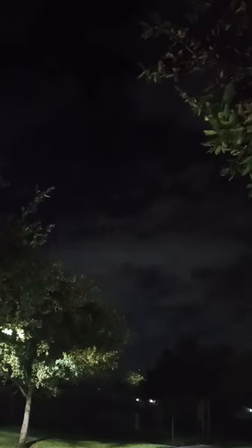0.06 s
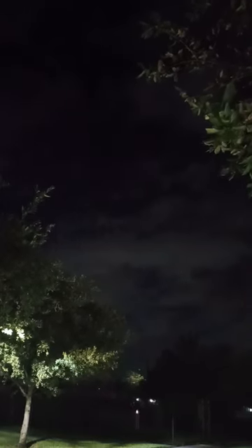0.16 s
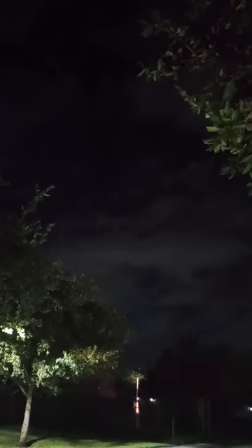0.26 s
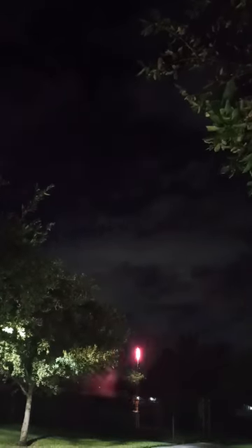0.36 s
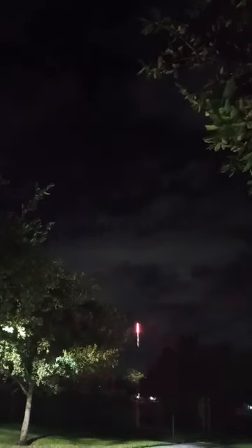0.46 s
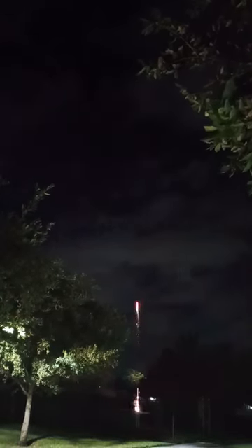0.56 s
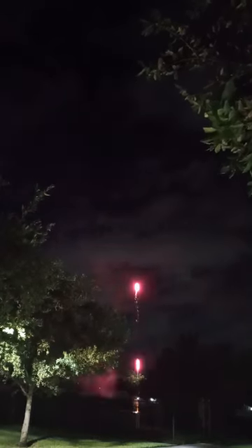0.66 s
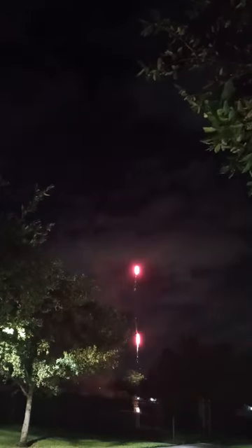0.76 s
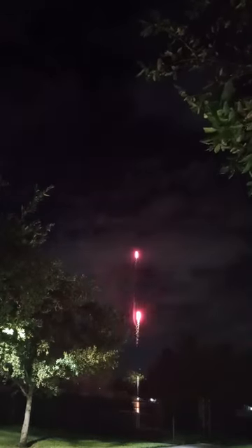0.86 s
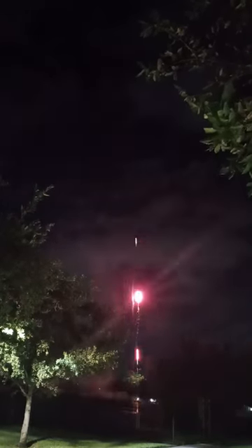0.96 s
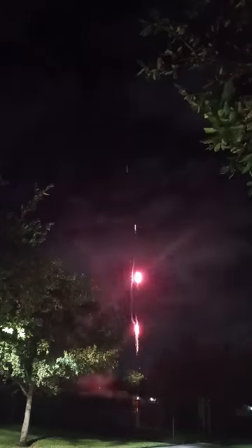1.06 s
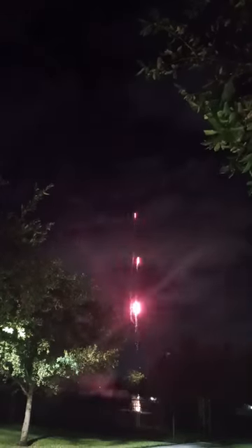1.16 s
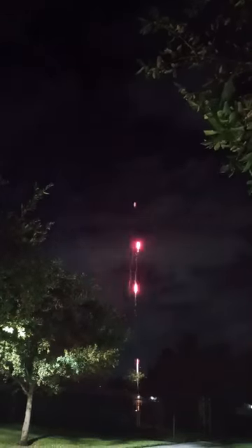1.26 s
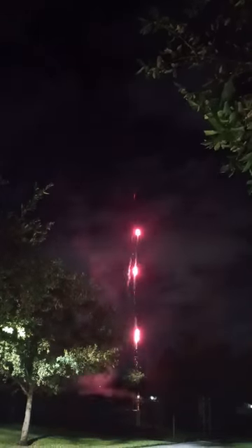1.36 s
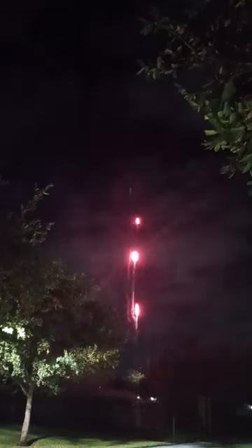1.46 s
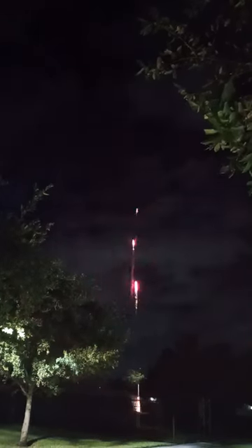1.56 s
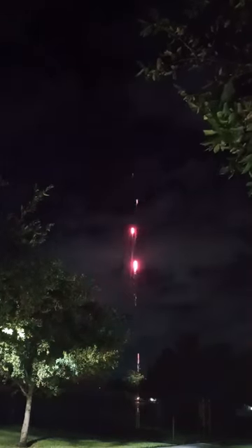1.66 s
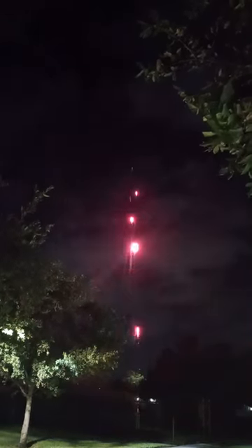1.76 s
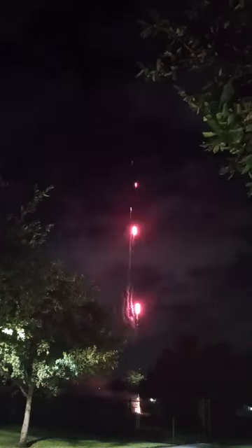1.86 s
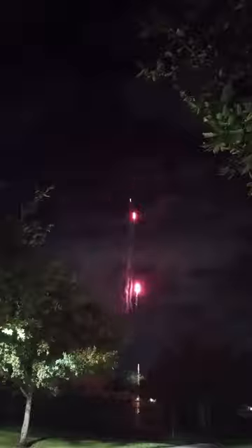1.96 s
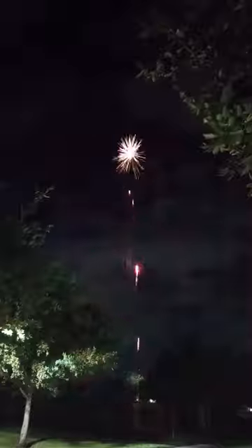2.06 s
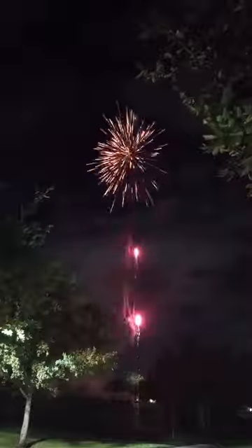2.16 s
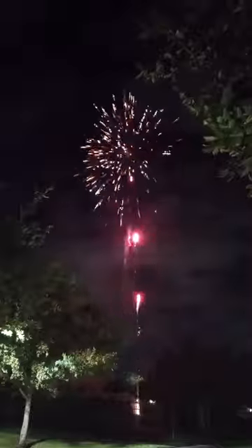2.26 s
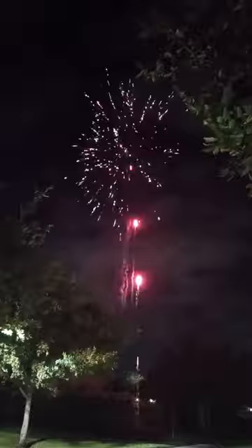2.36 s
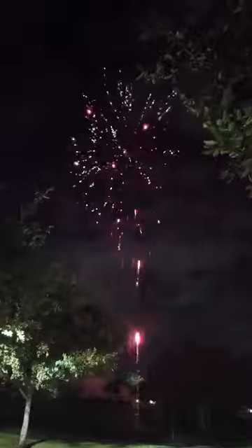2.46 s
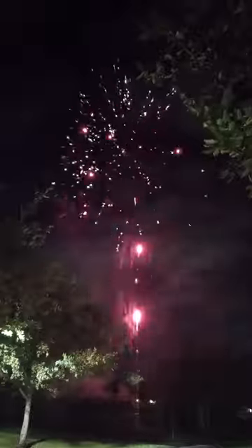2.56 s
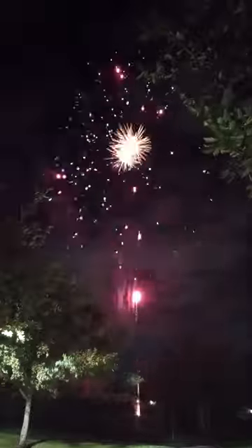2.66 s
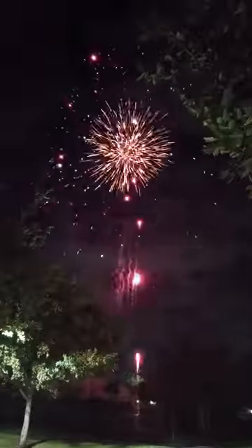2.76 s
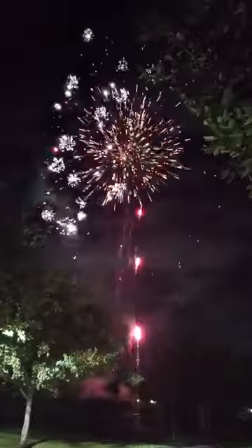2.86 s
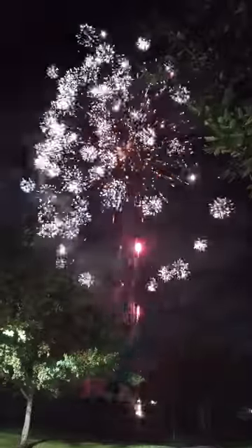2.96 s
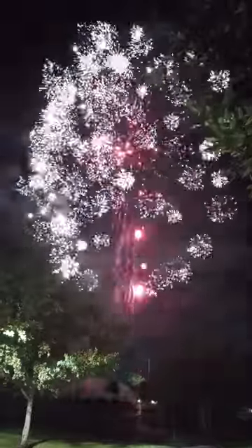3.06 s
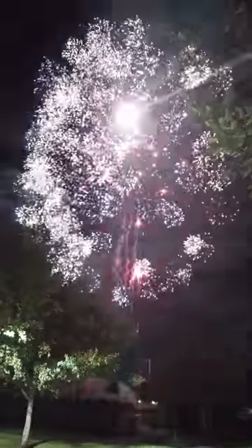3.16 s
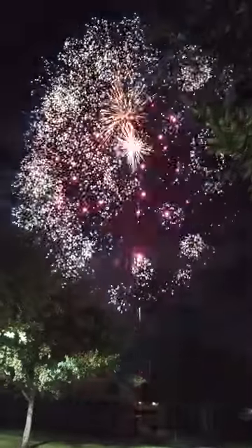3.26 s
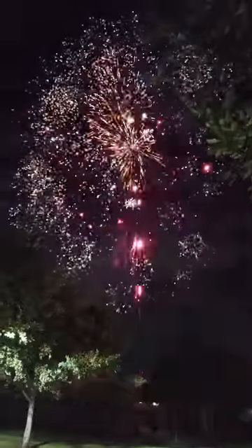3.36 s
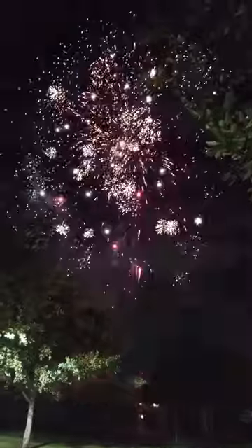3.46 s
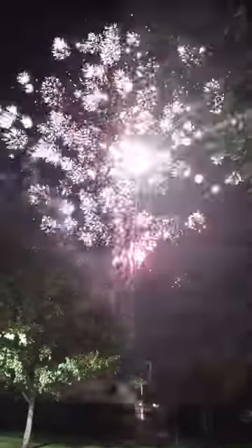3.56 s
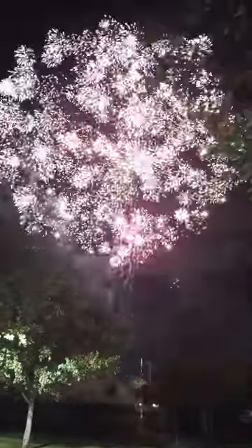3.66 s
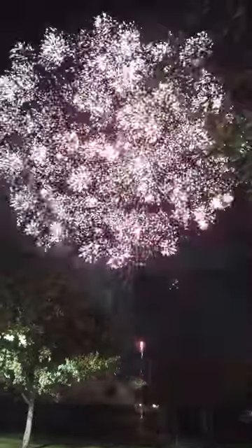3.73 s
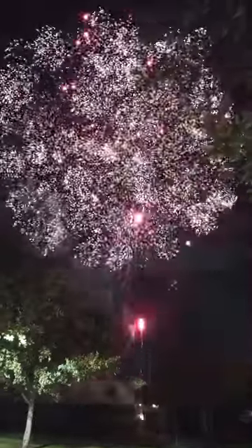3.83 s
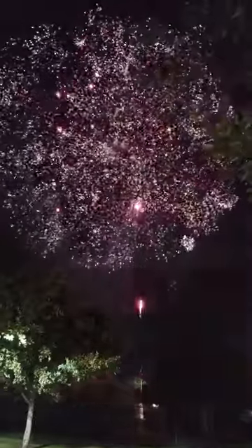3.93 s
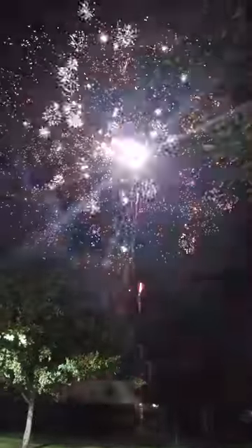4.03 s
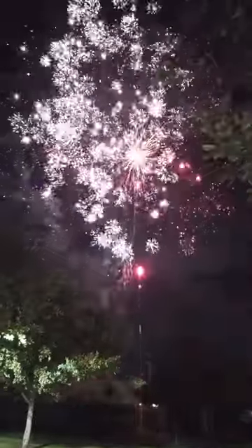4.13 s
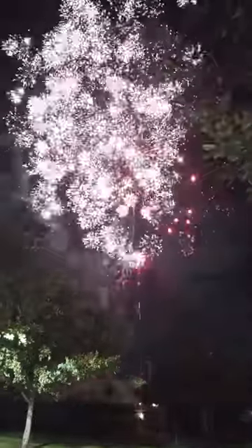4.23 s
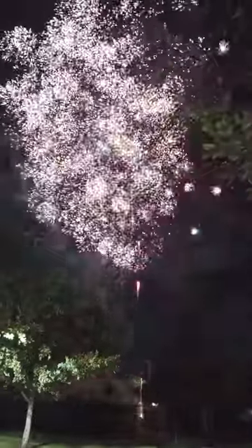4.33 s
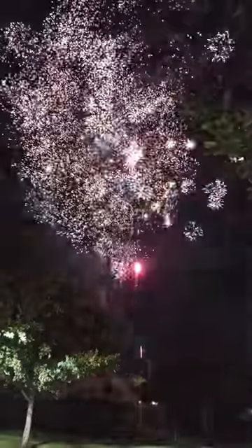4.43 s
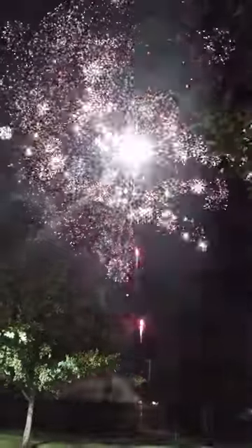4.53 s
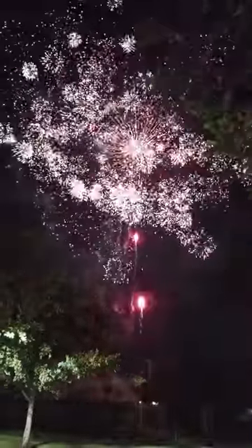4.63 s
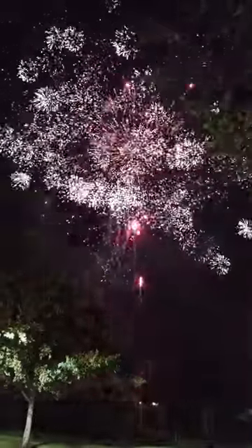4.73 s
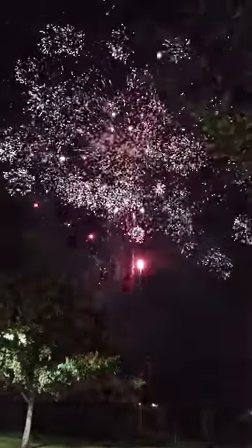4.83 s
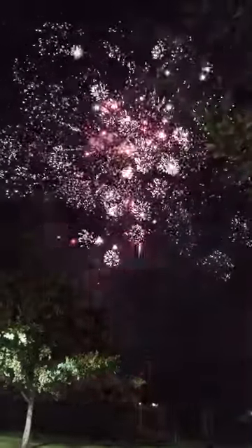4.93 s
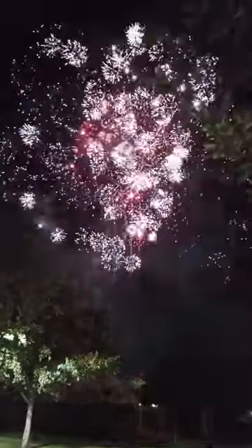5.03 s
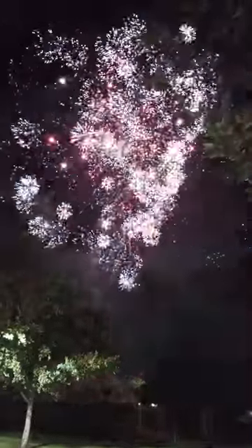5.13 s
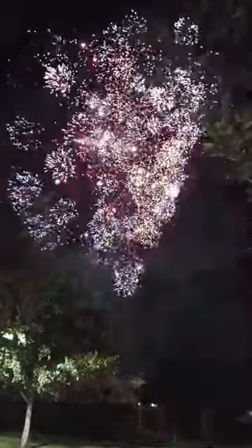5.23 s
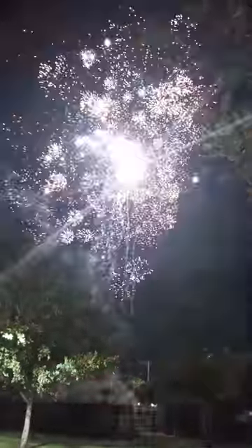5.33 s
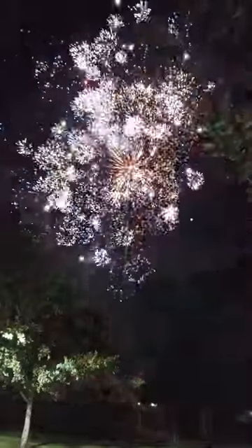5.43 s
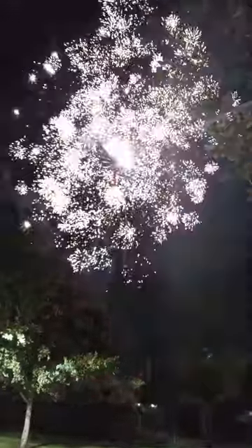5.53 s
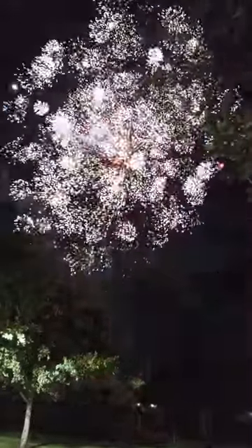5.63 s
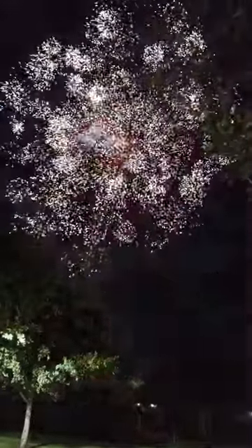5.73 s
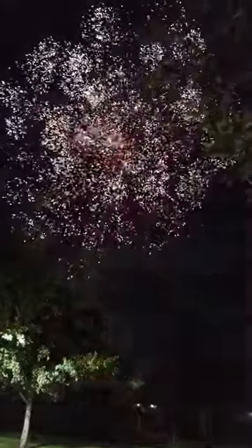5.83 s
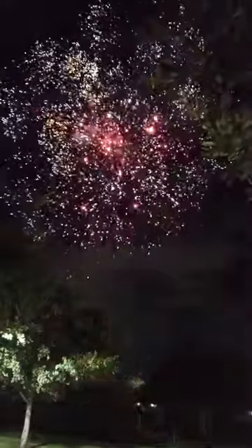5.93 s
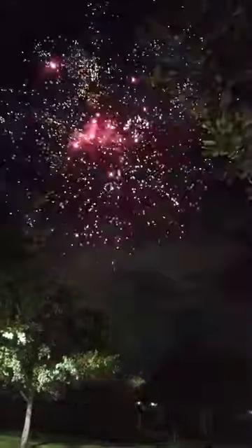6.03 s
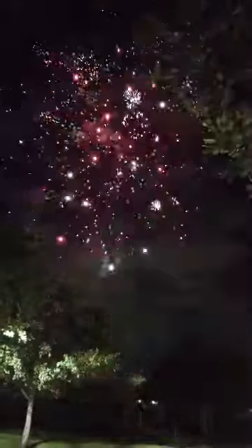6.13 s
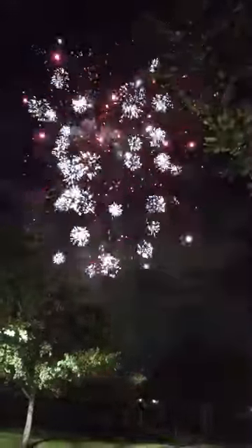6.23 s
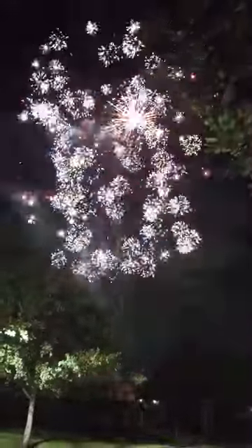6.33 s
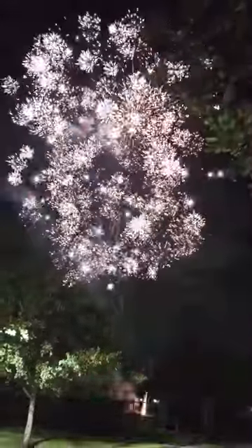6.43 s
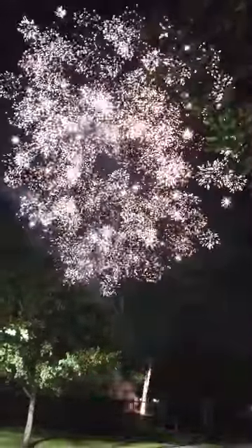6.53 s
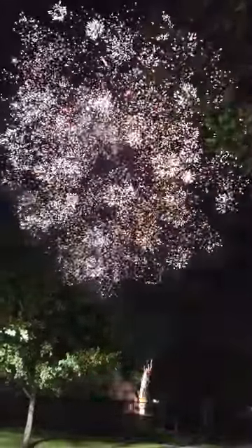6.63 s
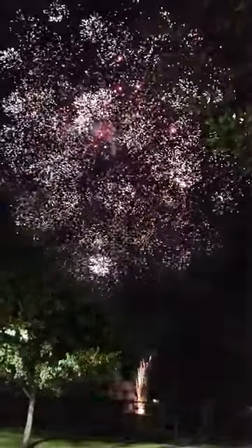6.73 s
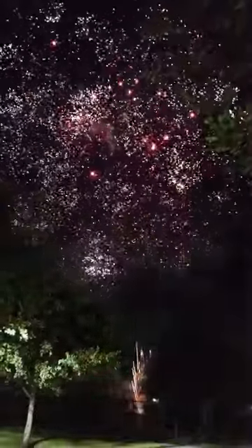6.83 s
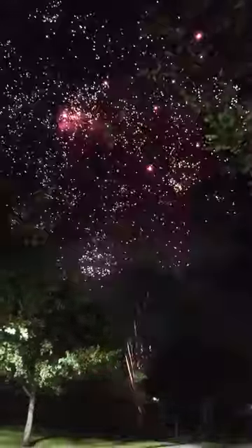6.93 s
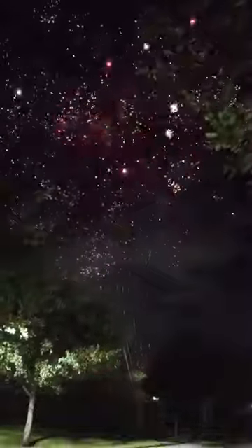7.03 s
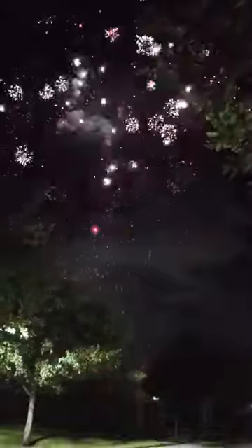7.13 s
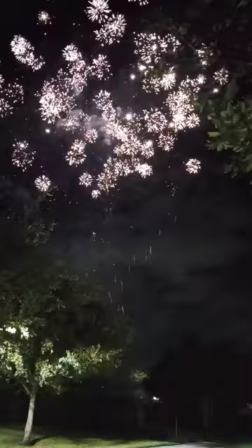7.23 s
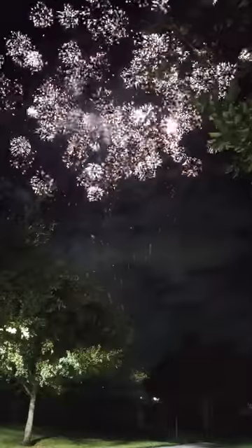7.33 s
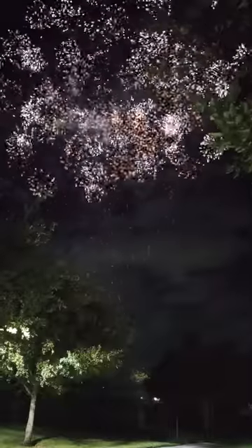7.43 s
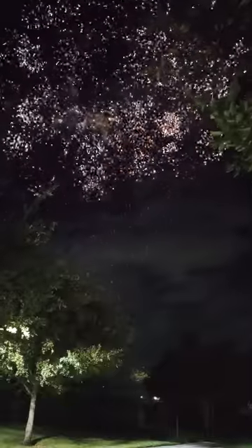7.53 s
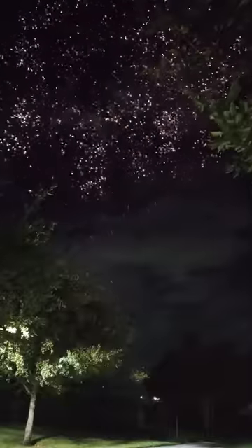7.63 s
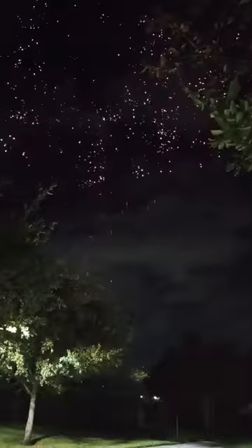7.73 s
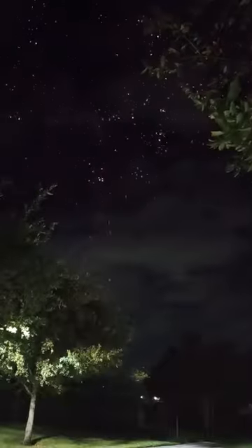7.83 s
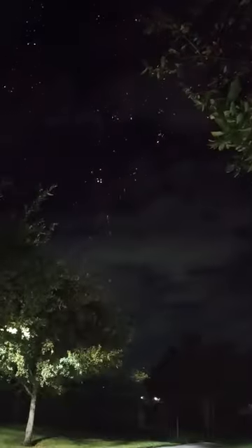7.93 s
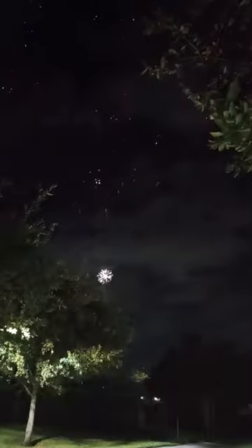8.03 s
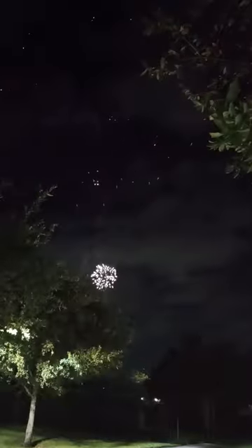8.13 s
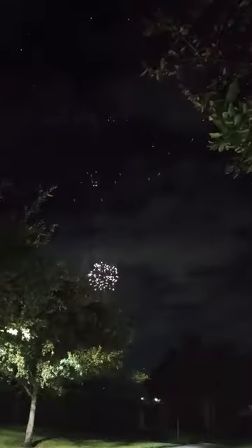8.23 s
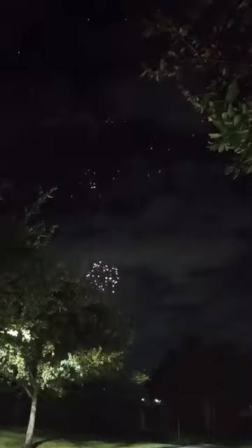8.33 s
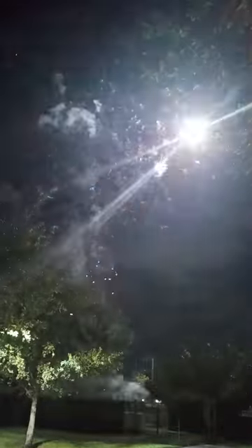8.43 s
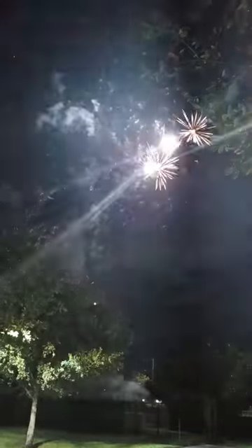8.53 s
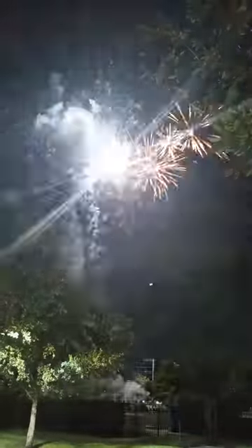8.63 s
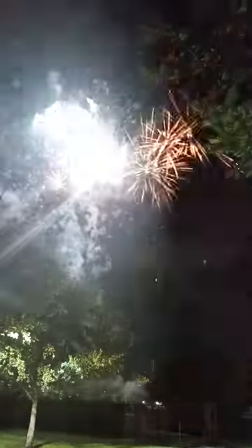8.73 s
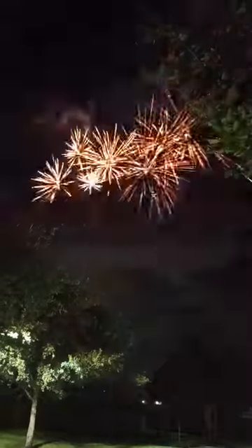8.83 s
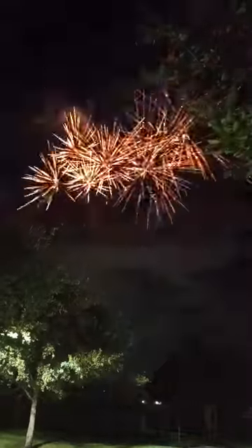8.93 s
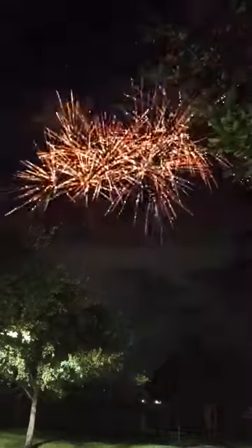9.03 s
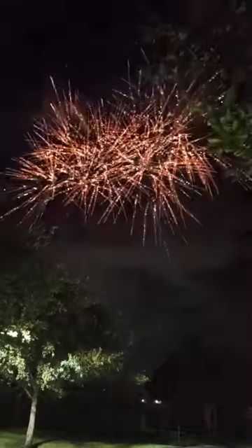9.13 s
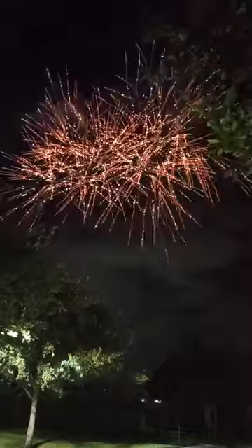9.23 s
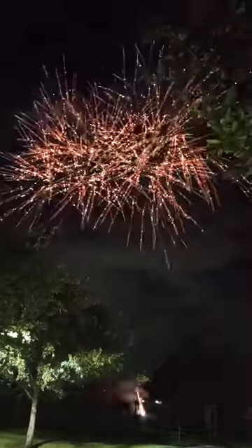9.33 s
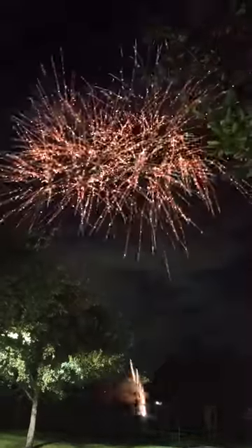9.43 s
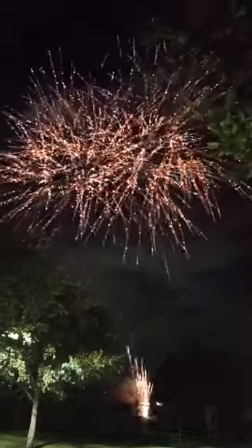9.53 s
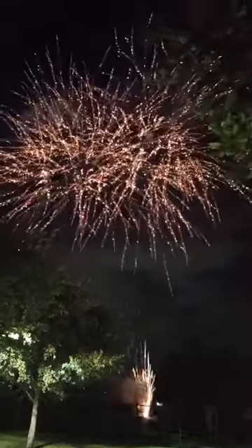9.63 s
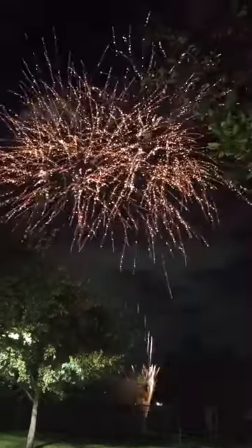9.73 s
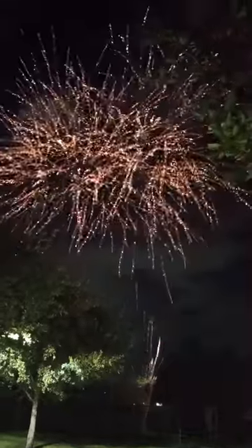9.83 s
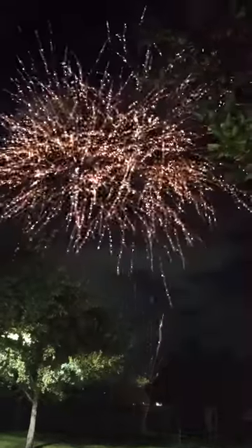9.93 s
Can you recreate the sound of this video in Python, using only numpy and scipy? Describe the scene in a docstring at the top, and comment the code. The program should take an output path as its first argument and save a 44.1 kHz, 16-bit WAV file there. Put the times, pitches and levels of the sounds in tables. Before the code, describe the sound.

In a quiet night park, mortar tubes pop and thump, shells bang overhead with tree echoes, and swarms of sharp crackles follow.

```python
"""A firework cake fires in a park at night. First still air with a faint band of insects that fades out,
a faint thin tone and tick, then mortar tubes crack and thump, with a few more thin tones. From 2.3 s shells
burst overhead as shock fronts and overload the microphone; clouds of crackling stars follow, built from tiny
shocks. Two quick volleys of tubes come at 6.8 s and 9.5 s. Trees scatter the reports, house walls echo them."""
import sys
import numpy as np
from scipy import signal
from scipy.io import wavfile
from scipy.ndimage import uniform_filter1d

SR = 44100
rng = np.random.default_rng(int(sys.argv[2]) if len(sys.argv) > 2 else 0)


def file_out(sig):
    """Save sig as 16-bit WAV at sys.argv[1]."""
    # one column per channel
    cols = np.atleast_2d(sig).T
    # limit, then scale
    lim = np.clip(cols, -1, 1)
    pcm = np.round(lim * 32767).astype(np.int16)
    wavfile.write(sys.argv[1], SR, pcm)


N = 440118
NONE = -120  # dB, stands for an absent layer

# All table levels are relative unless noted.
# Night air spectrum: hz, density_db_per_hz
NIGHT_SPECTRUM = [(18, -35), (30, -15), (81, 8.5), (240, 1), (320, -4.5), (629, -6.5), (794, -7.5),
                  (1110, -10.5), (5730, -26.5), (7240, -50), (8040, -29.5), (15000, -43)]
NIGHT_DB = -64.5  # RMS level
# Insect band spectrum: hz, density_db_per_hz
INSECT_SPECTRUM = [(6500, -74), (6900, -18.5), (7100, -9.5), (7350, -17), (7800, -63)]
# Brief thin tones, the first a faint one before the shots: start_s, length_s, pitch_hz, level_db
THIN_TONES = [(0.387, 0.061, 2190, -55), (1.473, 0.024, 3860, -44), (9.294, 0.081, 3557, -45.5),
              (9.884, 0.087, 3780, -45)]
# A faint tick, then tube firings, singly, then two quick volleys: start_s, crack_db, thump_db
LAUNCHES = [(.3955, -53, -66), (0.441, -23.5, -20.5), (.776, -24, -21), (1.0322, -24, -21.5),
            (1.4032, -24.5, -19), (1.7708, -25.5, -19.5), (2.0911, -24, -22), (2.852, -25, -25.5),
            (6.785, -21, -34), (6.8385, -26, -49), (6.867, -42, -51), (6.893, -39, -54), (6.9202, -37, -52),
            (6.9774, -28.5, -39), (7.0201, -34, -30.5), (9.539, -29, -37), (9.5764, -30.5, -34),
            (9.615, -28.5, -36), (9.6486, -35, -29.5), (9.6978, -31, -30.5), (9.7337, -30, -36),
            (9.7726, -30.5, -38), (9.828, -28.5, -35), (9.871, -25.5, -34), (9.956, -43, -42)]
# Cardboard tube modes: pitch_hz, level_db, t60_s
TUBE_MODES = [(1730, -4, 0.011), (2087, 1, 0.032), (2615, -8, 0.014), (3336, -5.5, 0.03), (5740, -7, 0.039),
              (6200, -5.5, 0.013), (7240, -10.5, 0.024), (9780, -24.5, 0.027)]
# Muzzle jet spectrum: hz, density_db_per_hz
MUZZLE_SPECTRUM = [(200, -13), (700, -8), (1500, -6.5), (4000, -11), (7000, -20), (10000, -19.5),
                   (16000, -29.5)]
# Far wall that returns a tube's crack, not its thump: delay_s, level_db, right_lead_s, lowpass_hz
SMALL_FAR_WALL = [(0.208, -3.5, .0002, 1360)]
# Walls heard from the tubes: delay_s, level_db, right_lead_s, lowpass_hz
WALLS_FROM_TUBES = [(.0865, -6.5, .0001, 3120), (.0905, -19, .0001, 500)]
# Tree scatter spectrum, tubes: hz, density_db_per_hz
TUBE_SCATTER = [(30, -18.5), (90, -17), (160, 7.5), (300, -1), (400, -26), (520, -26.5), (800, -10),
                (1900, -8), (2600, -14), (3800, -12.5), (6200, -18), (9000, -27.5), (16000, -33)]
# Tree stands near to far, tubes: delay_s, rise_s, level_db, t60_s (before air loss)
TREES_FROM_TUBES = [(0.0014, 0.0016, -2.5, 0.65), (0.026, 0.023, 1, 0.4), (.03, .04, -5, 1.4)]
# Shell bursts, NONE where a layer is absent: start_s, blast_db, deep_swing_db, crackle_db
BURSTS = [(2.346, 8, NONE, -19.5), (2.9403, 11, -5.5, -18.5), (3.4732, -5, -28, -24.5),
          (3.52, -1.5, NONE, -19.5), (3.858, -6, -15, -25.5), (4.3458, -4.5, NONE, -24),
          (4.7159, -7, -64, -28), (4.856, -9.5, -33, -24), (5.643, -5, -13.5, -25.5),
          (5.8243, -6.5, -13.5, -22.5), (6.584, -5.5, -10, -24), (8.707, -5, -23, NONE),
          (8.7475, -7, NONE, NONE), (8.8165, -5, NONE, NONE), (8.857, -6, NONE, NONE),
          (8.949, -7.5, NONE, NONE), (9.031, -6.5, NONE, NONE), (9.068, -9, NONE, NONE),
          (9.088, -13.5, NONE, NONE), (9.096, -11, NONE, NONE)]
# Ground and things nearby: delay_s, level_db, right_lead_s, lowpass_hz
NEARBY = [(.0015, -16.5, 0.00054, 7000), (.0028, -6, 0.00025, 1500), (.0054, -1.5, .0005, 1310),
          (.0079, -5, 0.00033, 1066)]
# Walls heard from the sky: delay_s, level_db, right_lead_s, lowpass_hz
WALLS_FROM_SKY = [(.046, -11.5, .0001, 920), (.082, -23, .0001, 600), (.189, -11.5, .0001, 233),
                  (0.1932, -12, .0001, 230), (.485, -34, .0002, 300)]
# Tree scatter spectrum, shells: hz, density_db_per_hz
SKY_SCATTER = [(30, -45), (60, -27.5), (100, -30.5), (160, -2), (210, 12), (290, -2.5), (380, 0.5),
               (550, -6), (1150, -9), (1800, -12), (2600, -15.5), (6000, -17), (8500, -27), (13000, -28.5),
               (16000, -28)]
# Tree stands near to far, shells: delay_s, rise_s, level_db, t60_s (before air loss)
TREES_FROM_SKY = [(.002, 0.0048, 6, 0.46), (.01, 0.015, -9, 1.81), (1.099, .8, -25.5, 1.7)]
# Low rumbling tail of a deep swing, spectrum: hz, density_db_per_hz
RUMBLE_SPECTRUM = [(25, -33.5), (60, -9), (90, -14.5), (140, -3), (300, -22), (1000, -72.5)]
# Rise and decay of that tail: delay_s, rise_s, level_db, t60_s (before air loss)
RUMBLE_TAIL = [(.002, 0.014, -2.2, 1.4)]
# Star pop spectrum: hz, density_db_per_hz
STAR_SPECTRUM = [(88, -51), (150, -27), (244, -19.5), (308, -15.5), (428, -16), (520, -20.5), (708, -5),
                 (1110, -7.5), (1320, -3.5), (2450, -11), (3980, -13.5), (6470, -14.5), (8600, -27),
                 (13800, -24), (15500, -23)]
# Lone star snaps: start_s, level_db
SNAPS = [(5.5148, -21.5), (5.5904, -20), (6.3683, -21.5), (6.4577, -18), (7.3544, -27), (7.3854, -38),
         (7.4107, -44), (7.6162, -13), (7.6847, -17.5), (8.3, -26)]
# Stars burn silently for a set time, then their crackle swells, holds and stops
STAR_BURN_S, CRACKLE_SWELL_S, CRACKLE_HOLD_S, CRACKLE_STOP_S = 0.733, 0.16, 0.15, 0.095
# Far trees' answer to a pop, spectrum: hz, density_db_per_hz
FAR_HISS_SPECTRUM = [(300, -3.5), (1100, -9.5), (1800, 1.5), (2800, -4.5), (6500, -2), (9000, -6), (16000, -1.5)]
# Flat spectrum: hz, density_db_per_hz
WHITE = [(20, 0), (16000, 0)]
# Path loss in air and leaves, scaled by a loss share: hz, loss_db_per_s
AIR_LOSS = [(60, 0.5), (250, 9.5), (600, 6.5), (1800, 3.5), (4000, 9), (7000, 30.5), (10000, 47),
            (16000, 46.5)]
# Left-right likeness of noise: hz, correlation (no unit)
LIKENESS = [(50, 0.99), (250, 0.97), (500, 0.88), (1000, 0.17), (2000, 0), (16000, 0)]
# Left-right balance of noise: hz, left_minus_right_db
BALANCE = [(50, 1), (250, -1), (500, 1.5), (1000, -3.5), (2000, -4.5), (4000, -2), (8000, -0.5),
           (13000, 1.5)]
# Microphone response: hz, gain_db
MICROPHONE = [(20, -1), (11000, 6.5), (13900, -1.5), (14700, 11.5), (15600, 5.5), (16000, -44.5)]
EDGE_HZ = 15900  # band limit


def amp(db):
    """Decibels to amplitude."""
    return 10 ** (np.asarray(db) / 20)


def evened(x):
    """Scale to unit RMS."""
    return x / np.sqrt(np.mean(x ** 2) + 1e-20)


def read(points, hz):
    """Interpolate a table along log frequency."""
    point_hz, value = np.transpose(points)
    return np.interp(np.log(hz + 1), np.log(point_hz + 1), value)


def add(mix, start_s, sound):
    """Add a sound in place, cut at the end of the mix."""
    part = mix[:, max(round(start_s * SR), 0):][:, :sound.shape[-1]]
    part += sound[..., :part.shape[1]]


def convolve(x, response):
    """Convolve along time, cut to N samples."""
    return signal.oaconvolve(np.atleast_2d(x), np.atleast_2d(response), axes=1)[:, :N]


def soften(x, hz, kind="low", order=2):
    """Butterworth filter, low-pass by default."""
    sos = signal.butter(order, min(hz, SR / 2 - 1), kind, fs=SR, output="sos")
    return signal.sosfilt(sos, x)


def click(spectrum, size=2048):
    """Minimum-phase pulse: the shortest causal pulse with this spectrum."""
    log_gain = np.log(amp(read(spectrum, abs(np.fft.fftfreq(size, 1 / SR)))))
    return np.fft.ifft(np.exp(np.conj(signal.hilbert(log_gain)))).real[:size // 2]


def noise(spectrum, length, loss=0., patchy_db=0., size=512):
    """Stereo noise with drifting patches; with loss, it fades by frequency as the path grows."""
    hz, hop = np.fft.rfftfreq(size, 1 / SR), size // 4
    t = np.arange(length // hop + 5)[:, None] * hop / SR
    a, b, c, d, patches = rng.standard_normal((5, len(t), len(hz)), dtype=np.float32)
    patches = uniform_filter1d(patches, size=6, axis=0)
    patches = evened(uniform_filter1d(patches, size=8, axis=1))
    same = np.clip(read(LIKENESS, hz), -1, 1)
    lean = amp(read(BALANCE, hz) / 2)
    left = a + 1j * b
    right = same * left + np.sqrt(1 - same ** 2) * (c + 1j * d)
    bins = np.array([left * lean, right / lean])
    bins *= evened(amp(read(spectrum, hz)))
    bins *= amp(patchy_db * patches - loss * t * read(AIR_LOSS, hz))
    out = signal.istft(bins, nperseg=size, noverlap=size - hop, time_axis=-2, freq_axis=-1)[1]
    return out[:, :length] / np.sqrt(size)


def scatter(spectrum, stands, patchy_db, lowest_hz=78):
    """Countless weak reflections, each stand rising then dying; the deepest bass is cut from them."""
    length_s = max(delay_s + rise_s + .8 * t60_s for delay_s, rise_s, _, t60_s in stands)
    t = np.arange(0, length_s, 1 / SR)
    power = np.zeros(len(t))
    for delay_s, rise_s, db, t60_s in stands:
        rise = np.clip((t - delay_s) / rise_s, 0, 1)
        fall_db = 60 * np.maximum(t - delay_s - rise_s, 0) / t60_s
        power += (rise * amp(db - fall_db)) ** 2
    return soften(noise(spectrum, len(t), 0.99, patchy_db) * np.sqrt(power), lowest_hz, "high", order=3)


def reflect(x, surfaces):
    """A stereo sound followed by its dulled echoes, each reaching one side first."""
    out = np.zeros((2, x.shape[1] + SR // 2))
    add(out, 0, x)
    for delay_s, db, right_lead_s, lowpass_hz in surfaces:
        echo = amp(db) * soften(x, lowpass_hz)
        add(out[:1], delay_s + right_lead_s / 2, echo[0])
        add(out[1:], delay_s - right_lead_s / 2, echo[1])
    return out


def swing(t, hz, cross, centre, width):
    """About one cycle of pressure: a sine under a Gaussian bell; cross, centre, width in cycles."""
    turns = t * hz
    return np.sin(2 * np.pi * (turns - cross)) * np.exp(-((turns - centre) / width) ** 2 / 2)


def night(insects_db=-76, hush_s=1.2):
    """Still air as steady noise, and a narrow insect band near 7 kHz that fades along a Gaussian."""
    air = evened(noise(NIGHT_SPECTRUM, N, size=2048))
    insects = evened(noise(INSECT_SPECTRUM, N, patchy_db=2, size=2048))
    fade = np.exp(-(np.arange(N) / SR / hush_s) ** 2)
    return amp(NIGHT_DB) * air + amp(insects_db) * insects * fade


def thin_tones(waver=0.031):
    """Short tones of randomly wavering pitch that swell and fade."""
    out = np.zeros((2, N))
    for start_s, length_s, pitch_hz, db in THIN_TONES:
        size = round(length_s * SR)
        drift = evened(soften(rng.standard_normal((2, size)), 200))
        turns = np.cumsum(pitch_hz * (1 + waver * drift), axis=1) / SR
        add(out, start_s, amp(db) * evened(np.sin(2 * np.pi * turns) * np.hanning(size)))
    return out


def tube_ring(t, colour_db=4.0, detune_share=0.023):
    """Decaying modes of one tube; no two ring quite alike."""
    detune = 1 + detune_share * rng.standard_normal((len(TUBE_MODES), 2, 1))
    colour = colour_db * rng.standard_normal(len(TUBE_MODES))
    ring = np.zeros((2, len(t)))
    for k, (hz, db, t60_s) in enumerate(TUBE_MODES):
        decay = amp(db + colour[k] - 60 * t / t60_s)
        ring += (-1) ** k * decay * np.sin(2 * np.pi * hz * detune[k] * t)
    return ring


def launches(ring_db=-3, jet_db=-4, jet_t60_s=0.016, thump_gain_db=9, thump_hz=212,
             trees_db=-5.5, trees_growth=1.19, crack_share=0.39, alike=0.4, full_db=-22):
    """The lift charge spits a jet of gas, rings the tube and thumps the air; a faint tick is made likewise."""
    out, t = np.zeros((2, N)), np.arange(SR // 25) / SR
    # all tubes stand in one spot, so the trees answer each in a partly shared way
    usual = scatter(TUBE_SCATTER, TREES_FROM_TUBES, patchy_db=3.5)
    for start_s, crack_db, thump_db in LAUNCHES:
        jet = amp(jet_db - 60 * t / jet_t60_s) * evened(noise(MUZZLE_SPECTRUM, len(t)))
        crack = amp(ring_db) * tube_ring(t) + jet
        shot = reflect(amp(crack_db) * crack, SMALL_FAR_WALL)
        thump = swing(t, thump_hz, cross=0.6, centre=1.0, width=0.46)
        add(shot, 0, amp(thump_db + thump_gain_db) * thump)
        add(out, start_s, reflect(shot, WALLS_FROM_TUBES))
        own = scatter(TUBE_SCATTER, TREES_FROM_TUBES, patchy_db=2.5)
        trees = alike * usual + np.sqrt(1 - alike ** 2) * own
        # weak shots stir the trees less than a full charge does
        shot_db = crack_share * crack_db + (1 - crack_share) * thump_db
        add(out, start_s, amp(trees_db + full_db + trees_growth * (shot_db - full_db)) * trees)
    return out


def deep_swing(t, swing_hz=76, right_db=9.0, rumble_db=-7):
    """One deep swing as strong fronts overload the microphone, mostly right, with a low rumbling tail."""
    out = amp(rumble_db) * scatter(RUMBLE_SPECTRUM, RUMBLE_TAIL, patchy_db=0)
    sides = amp([[-right_db], [right_db]])
    add(out, 0, swing(t, swing_hz, cross=.77, centre=.8, width=.42) * sides)
    return out


def bursts(push_s=0.00083, blast_gain_db=17.5, low_cut_hz=210, front_hz=3000,
           trees_db=-8.0, trees_growth=0.69, walls_growth=0.48):
    """A shock front with its suction phase, doubled by the ground and things nearby, then walls and trees."""
    out, t = np.zeros((2, N)), np.arange(SR // 12) / SR
    shock = soften((1 - t / push_s) * np.exp(-t / push_s), low_cut_hz, "high")
    shock = soften(shock, front_hz, order=1)  # the long way down rounds the front
    deep = deep_swing(t)
    for start_s, blast_db, deep_db, _ in BURSTS:
        # every shell bursts in another place, so its paths differ a little
        near = np.array(NEARBY)
        near[:, 0] *= 1 + .04 * rng.standard_normal(len(near))
        blast = reflect(amp(blast_db + blast_gain_db) * np.array([shock, shock]), near)
        # echoes gather sound from all sides of a shell, so they vary less than its direct blast
        walls = [(delay_s, wall_db + (walls_growth - 1) * blast_db, right_lead_s, lowpass_hz)
                 for delay_s, wall_db, right_lead_s, lowpass_hz in WALLS_FROM_SKY]
        add(out, start_s, reflect(blast, walls))
        add(out, start_s, amp(deep_db) * deep)
        trees = scatter(SKY_SCATTER, TREES_FROM_SKY, patchy_db=2.5)
        add(out, start_s, amp(trees_db + trees_growth * blast_db) * trees)
    return out


def crackle_level(curve=1.5):
    """Each shell's cloud of stars swells, holds and stops; overlapping clouds add in power."""
    corners_s = np.cumsum([STAR_BURN_S, CRACKLE_SWELL_S, CRACKLE_HOLD_S, CRACKLE_STOP_S])
    t, power = np.arange(N) / SR, np.zeros(N)
    for start_s, _, _, db in BURSTS:
        if db > NONE:
            swell = np.interp(t - start_s, corners_s, [0, 1, 1, 0]) ** curve
            power += (amp(db) * swell) ** 2
    return np.sqrt(power)


def foliage(direct_db=-10, smear_t60_s=0.027):
    """The direct path of a small pop: close leaves smear it."""
    t = np.arange(SR // 30) / SR
    close = noise(WHITE, len(t)) * amp(-60 * t / smear_t60_s)
    path = close / np.linalg.norm(close[0]) / 2
    path[:, 0] += amp(direct_db)
    return path


def far_hiss(trees_db=-14.0, trees_t60_s=1.63, air_share=0.17):
    """Far trees answer a small pop with a soft hiss."""
    t = np.arange(2 * SR) / SR
    far = noise(FAR_HISS_SPECTRUM, len(t), air_share) * amp(-60 * t / trees_t60_s)
    return amp(trees_db) * far / np.linalg.norm(far[0])


def stars(per_s=1700, cloud_db=0, size_spread_db=3.5, snap_gain_db=18, top_hz=8000, paths=12):
    """Each star pops with one tiny shock; the louder the cloud, the thicker the pops fall."""
    level = crackle_level()
    density = level / level.max()
    at = np.flatnonzero(rng.random(N) < per_s * density / SR)
    sizes = evened(amp(size_spread_db * np.minimum(rng.exponential(1, N)[at], 3)))
    # sparser pops are each larger, so the cloud keeps its level
    sizes *= amp(cloud_db) * level[at] * np.sqrt(SR / (per_s * density[at]))
    at = np.r_[at, [round(start_s * SR) for start_s, _ in SNAPS]]
    sizes = np.r_[sizes, [amp(db + snap_gain_db) for _, db in SNAPS]]
    # the cloud fills the sky: each part of it is heard by another path
    part = rng.integers(0, paths, N)[at]
    out = convolve(np.bincount(at, sizes, N), far_hiss())
    for k in range(paths):
        out += convolve(np.bincount(at, sizes * (part == k), N), foliage())
    pop = click(STAR_SPECTRUM)
    pop = soften(pop / np.linalg.norm(pop), top_hz, order=1)
    return reflect(convolve(out, pop), NEARBY[:1])[:, :N]


def scene(stars_right_db=0.34):
    """The night, thin tones, tubes on the ground, shells and crackle in the sky."""
    crackle = stars() * amp([[-stars_right_db], [stars_right_db]])
    return night() + thin_tones() + launches() + bursts() + crackle


def record(dry, limit_db=-9, squeeze=0.51, recover_db_per_s=75, attack_hz=35, grit_low_hz=130):
    """A limiter ducks after each blast, too late to stop its front from clipping; then the band limit."""
    x = convolve(dry, click(MICROPHONE))
    power_db = 10 * np.log10(abs(soften((x ** 2).mean(0), attack_hz, order=1)) + 1e-12)
    # peak hold that falls at a steady rate
    fall_db = np.arange(N) / SR * recover_db_per_s
    held_db = np.maximum.accumulate(power_db + fall_db) - fall_db
    over_db = np.maximum(held_db - limit_db, 0)
    x = x / amp(squeeze * soften(over_db, attack_hz, order=1))
    # flattened peaks add grit, but no rumble
    grit = x / (1 + x ** 6) ** (1 / 6) - x
    x = np.clip(x + soften(grit, grit_low_hz, "high"), -1, 1)
    band = signal.firwin(301, EDGE_HZ, window=("kaiser", 8), fs=SR)
    return signal.oaconvolve(x, band[None], "same")


dry = scene()
out = record(dry)
file_out(out)
```